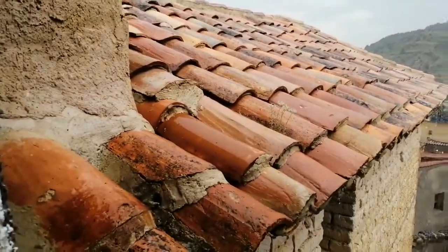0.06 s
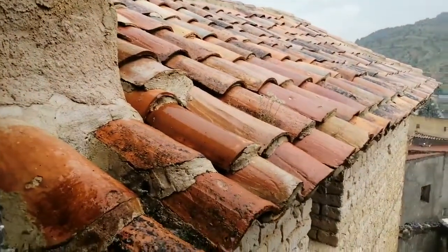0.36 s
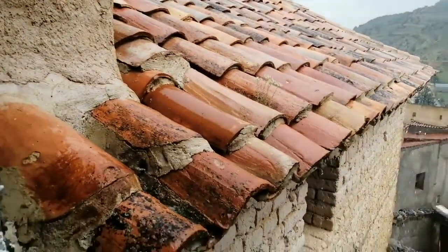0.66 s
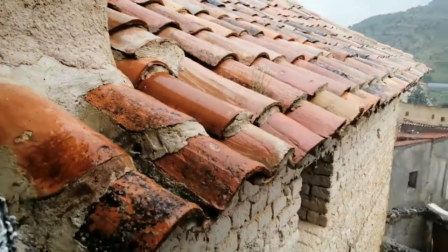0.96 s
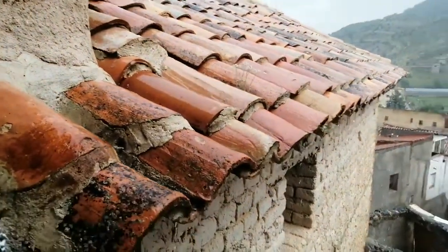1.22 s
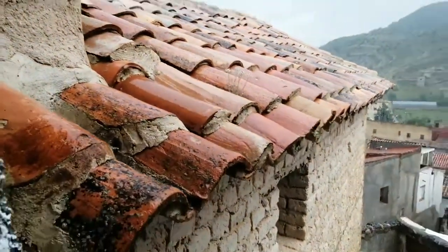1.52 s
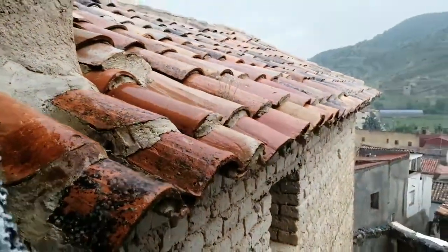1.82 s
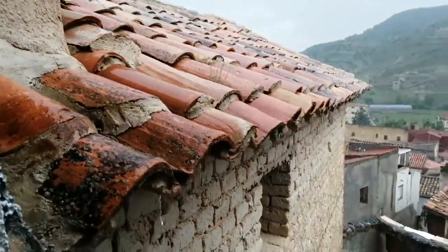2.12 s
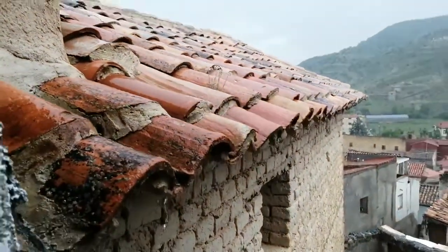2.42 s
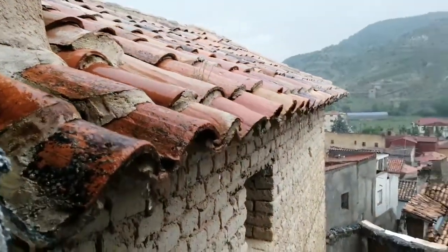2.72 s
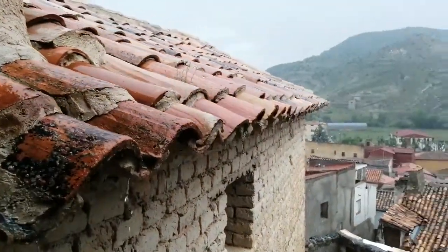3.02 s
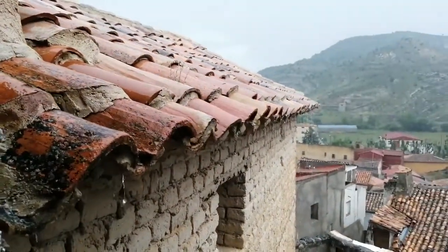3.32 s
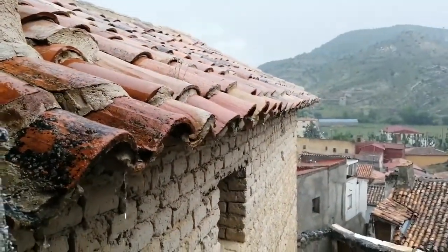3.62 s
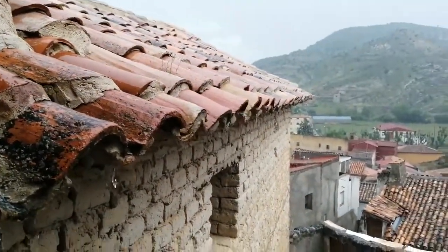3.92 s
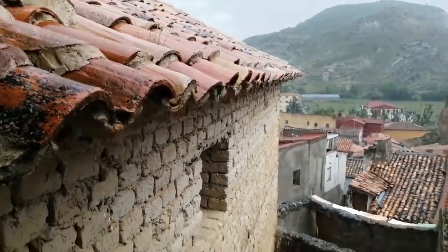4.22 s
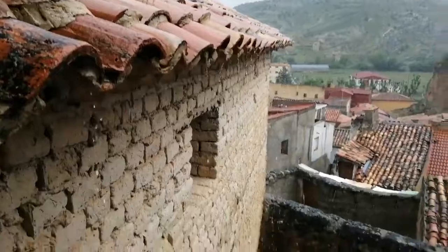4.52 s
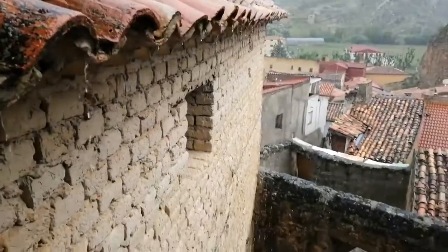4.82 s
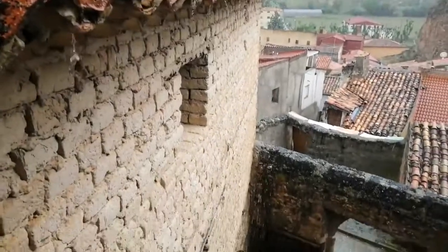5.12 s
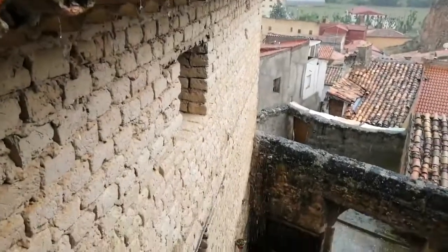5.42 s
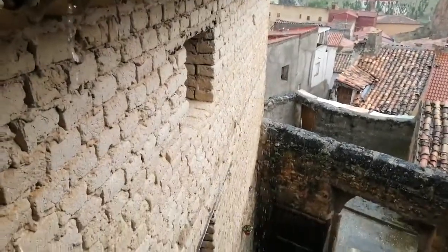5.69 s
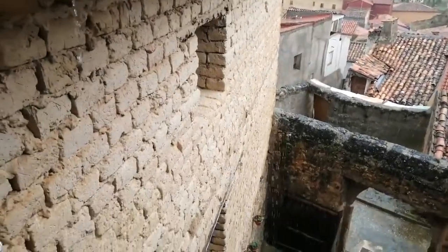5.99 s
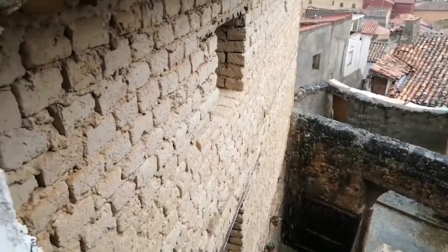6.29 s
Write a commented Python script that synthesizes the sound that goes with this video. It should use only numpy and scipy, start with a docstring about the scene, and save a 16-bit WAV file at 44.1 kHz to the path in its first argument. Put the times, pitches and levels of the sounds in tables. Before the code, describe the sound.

Steady rain patters and hisses on a clay tile roof, heard in stereo from close by the eaves. Single near drops tick and splash at uneven intervals, some with a faint hollow ring. Wind buffets the left side of the microphone at the start with a few low thumps, then comes and goes as a soft rumble. About halfway through, a stronger gust rushes past and fades while the rain carries on.

```python
"""Rain on a clay tile roof

Steady rain, heard from just under the eaves. Near drops tick on the wet tiles, make them ring
and burst into spray, over the patter and hiss of the whole roof. Gusts of wind rumble, rush and
briefly moan, and their eddies (small swirls of air) buffet the left and right microphones."""
import sys
import numpy as np
from scipy import signal
from scipy.fft import rfft, irfft, next_fast_len
from scipy.io import wavfile

SR = 44100
rng = np.random.default_rng(int(sys.argv[2]) if len(sys.argv) > 2 else 0)


def to_wav(sig):
    """Store sig (one row per channel, or 1-D mono) as 16-bit WAV at the path in sys.argv[1].

    Samples outside -1..1 are clipped; the rate is SR.
    """
    pcm = np.clip(np.atleast_2d(sig), -1, 1) * 32767
    pcm = np.round(pcm).astype(np.int16)
    wavfile.write(sys.argv[1], SR, pcm.T)  # frames by channels


N = 280035
TIME = np.arange(N) / SR
FFT_SIZE = next_fast_len(N + N % 2, True)

# Near drops. Each row: start in seconds, tick in dB, splash in dB, size from 0 (fine) to 1 (fat),
# tile ring in dB, ring pitch in Hz. Each level compares a drop with the other drops.
NEAR_DROPS = [(0.119, -16, -48, .5, -48.5, 2560), (0.137, -33, -46.5, 0.79, -64, 2500),
              (0.262, -26.5, -47.5, .4, -74, 2100), (0.315, -23, -49, 0.48, -70, 2700),
              (0.519, -31, -44.5, 0.84, -53, 2700), (0.54, -28, -60, 0.27, -46, 2500),
              (0.677, -14, -48, 0.5, -53, 2700), (0.738, -31, -47, 0.69, -60, 2350),
              (0.958, -24, -48.5, 0.35, -46, 2200), (1.004, -31, -45.5, .5, -60, 2690),
              (1.133, -21, -53, .4, -46.5, 2800), (1.205, -32, -47, .4, -47.5, 2400),
              (1.265, -24, -44.5, 0.31, -81, 2300), (1.335, -41, -56, 0, -73, 1600),
              (1.4, -22, -42.5, 0.19, -73, 2700), (1.445, -25, -49.5, 0.63, -60, 2600),
              (1.6, -34, -48.5, 0, -70, 2600), (1.828, -21, -45.5, 0.88, -46.5, 2610),
              (1.958, -21, -47, 0.37, -42, 2680), (1.99, -28, -46, 0.92, -60, 2900),
              (2.091, -36, -46.5, 0.29, -51.5, 2650), (2.32, -29, -48, 0.094, -52, 2600),
              (2.414, -37, -49, 0.33, -45.5, 2280), (2.481, -38, -64, 0.28, -47, 1970),
              (2.538, -32, -46.5, 0.46, -56, 2100), (2.908, -35, -51, 0, -73, 2200),
              (2.982, -27, -46, 0.22, -53, 2880), (3.057, -25, -47, .2, -56, 2500),
              (3.321, -18, -45.5, 0.18, -69, 3000), (3.499, -22, -46, 0.11, -72, 3100),
              (3.548, -38, -57, 0, -70, 2600), (3.844, -20.5, -46.5, .9, -52, 3000),
              (4.012, -33, -49, .2, -72, 1900), (4.081, -23, -48.5, 0, -74, 2150),
              (4.236, -31, -49, 0.037, -53, 3000), (4.308, -27, -46.5, 0.41, -46.5, 2470),
              (4.48, -29, -54, .3, -48, 2520), (4.646, -24, -51, 0, -55, 3050),
              (4.863, -29, -50.5, 0.45, -62, 2600), (5.172, -37, -55, 0, -51.5, 2750),
              (5.359, -23, -48, 0.16, -59, 3350), (5.481, -22, -44.5, 1, -42, 2700),
              (5.536, -31, -48.5, 0.65, -55, 2750), (5.699, -31, -47, 0.16, -49, 2800),
              (5.909, -33, -52, 0, -54, 3250)]
# How hard it rains. Each row: time in seconds, high patter and low body of the tiles in relative dB.
RAIN_LEVELS = [(0.0, -46.5, -58), (1.15, -46.5, -58), (1.48, -45, -59.5), (2.35, -46, -56),
               (2.71, -46, -59.5), (3.38, -47.5, -60), (4.54, -47.5, -58.5), (4.99, -49, -59),
               (5.61, -47, -57), (5.89, -47, -59), (6.35, -46, -59.5)]
# The tone of the rain. Each row: frequency in Hz, left gain in dB, right gain in dB.
RAIN_TONE = [(100, -6, -12.5), (524, -13, -17), (1000, -8.5, -17), (1410, -10.5, -16.5), (1810, -9, -17),
             (2140, -13.5, -16.5), (2410, -13, -18), (3470, -15, -14.5), (3840, -16.5, -18),
             (5350, -9, -9.5), (5960, -7, -12), (6875, -2.5, -14.5), (7800, -15, -21.5),
             (11500, -18.5, -22), (14100, -18, -17.5), (15000, -15.5, -21)]
# How alike the rain is at two microphones a hand apart.
# Each row: frequency in Hz, likeness from -1 (opposite) to 1 (the same).
RAIN_LIKENESS = [(100, 0.8), (800, 0.29), (1150, -0.35), (1750, -0.47), (2250, 0.59), (3000, -0.13),
                 (3700, -0.11), (6000, -0.036)]
# How hard the wind blows. Each row: time in seconds, level of its rush in relative dB.
WIND_LEVELS = [(0, -57.5), (0.5, -67), (0.72, -56.5), (1.02, -63), (1.38, -61.5), (1.98, -67), (2.55, -64),
               (2.86, -47), (3.08, -43), (3.21, -43), (3.28, -38), (3.37, -50.5), (3.72, -49.5),
               (4.17, -60.5), (4.52, -56), (5.69, -64.5), (5.82, -53.5), (5.98, -63.5), (6.35, -62)]
# Puffs that swell the rumble. Each row: middle in seconds, peak in relative dB, half length in seconds.
WIND_PUFFS = [(0.536, -36, 0.29), (0.793, -44.5, 0.22), (1.216, -42.5, 0.032), (1.405, -43, 0.17),
              (1.758, -46, 0.079), (2.3, -51, .05), (2.754, -36, 0.15), (2.893, -33.5, 0.049),
              (3.118, -31.5, 0.074), (3.353, -36.5, .06), (3.695, -38, 0.071), (3.966, -47, 0.099),
              (4.51, -44.5, 0.093), (5.83, -44.5, 0.064)]
# The tone of the wind's deep rumble. Each row: frequency in Hz, gain in dB.
RUMBLE_TONE = [(20, -43), (50, -4), (80, -3), (130, 1.5), (200, 0), (250, -9), (310, -13), (450, -19),
               (700, -30.5), (1500, -66.5)]
# The tone of the wind's higher rush. Each row: frequency in Hz, gain in dB.
RUSH_TONE = [(150, -24), (320, -8.5), (420, -0.5), (520, -2), (620, -4.5), (740, -7), (1080, -10),
             (1280, -21.5), (1700, -27.5), (3000, -57.5)]
# How hard eddies hit the microphones. Each row: time in seconds, left and right level in relative dB.
EDDY_LEVELS = [(0, -25, -43), (0.15, -22, -49), (0.38, -24, -56), (0.58, -40, -45), (0.78, -51, -55),
               (1.28, -42, -38), (1.72, -58, -41.5), (1.88, -49, -51.5), (2.25, -42, -48.5),
               (2.42, -48.5, -71), (2.87, -51, -38.5), (3.25, -37.5, -52), (3.6, -53, -64),
               (4.55, -53.5, -73), (6.35, -51.5, -67)]
# The tone of a soft eddy. Each row: frequency in Hz, gain in dB.
SOFT_EDDY_TONE = [(10, -6.5), (25, -1), (42, -6), (70, -1.5), (120, -4), (200, -7.5), (350, -24),
                  (600, -34), (1200, -90)]
# The tone of a hard eddy. Each row: frequency in Hz, gain in dB.
HARD_EDDY_TONE = [(10, -10), (25, -11), (42, -6), (70, 1), (130, -1), (210, -5), (330, -20), (520, -29),
                  (700, -47), (1400, -66)]
# The hardest eddies, all on the left microphone. Each row: time in seconds, peak in dB.
EDDY_THUMPS = [(0.119, -18), (0.266, -18), (0.294, -13), (0.321, -15.5), (0.387, -13.5), (0.398, -14.5)]
# The wind moans as it speeds up. Each row: middle in seconds, peak in relative dB,
# half length in seconds, pitch at the middle in Hz.
WIND_MOANS = [(0.665, -55, 0.12, 626), (3.1, -58, .16, 987), (3.279, -49, 0.021, 1120)]


def roof():
    """Far drops merge into hiss; nearer ones each make a tick or a short burst of droplets."""
    patter_db, body_db = in_time(RAIN_LEVELS)
    hiss = from_db(-2) * rng.standard_normal((2, N))
    splashes = (from_db(-12) * far_splashes(per_s=70, spread_db=3.8, low_hz=1250, high_hz=4020)
                + from_db(-8) * far_splashes(per_s=90, spread_db=0.47, low_hz=4860, high_hz=7900)
                + from_db(-8.5) * far_splashes(per_s=46, spread_db=4.3, low_hz=7550, high_hz=18000))
    ticks = from_db(-12) * clicks(per_s=450, spread_db=2.2)
    fine_ticks = from_db(-12) * rms_one(band(clicks(per_s=80, spread_db=3.5), 11000, 17000))
    rain = colour(all_around(hiss + splashes + ticks + fine_ticks), RAIN_TONE)
    split_hz = 3900
    low = signal.sosfilt(signal.butter(2, split_hz, fs=SR, output="sos"), rain)
    high = signal.sosfilt(signal.butter(2, split_hz, "high", fs=SR, output="sos"), rain)
    patter = from_db(patter_db + 0.5) * high / band(high, split_hz, 10600).std()
    body = from_db(body_db - 0.48) * low / band(low, 1570, 3700).std()
    return patter - body  # the halves swing opposite ways where they meet, so one is flipped


def far_splashes(per_s, spread_db, low_hz, high_hz):
    """Drops hit at random moments, each throwing up a cloud of droplets that soon land again."""
    t = TIME[:SR // 2]
    rise_s, fall_s = 0.0034, 0.011
    one_cloud = (1 - np.exp(-t / rise_s)) ** 2 * np.exp(-t / fall_s)
    power = signal.fftconvolve(impacts(per_s, spread_db) ** 2, one_cloud / one_cloud.max())[:N]
    droplets = band(clicks(per_s=5000, spread_db=2), low_hz, high_hz)
    return rms_one(np.sqrt(np.maximum(power, 0)) * droplets)


def near_drops():
    """Each drop ticks on a tile, splashes, makes the tile ring hollowly and throws fine spray."""
    length = SR // 6
    droplets = colour(clicks(per_s=6000, spread_db=3), RAIN_TONE)
    splash_noise, ring_noise = band(droplets, 3100, 7850), band(droplets, 1380, 5000)
    # fine droplets are few enough to tick one by one
    spray_noise = band(colour(clicks(per_s=2800, spread_db=4.5), RAIN_TONE), 6650, 16000)
    tick_noise = band(colour(rng.standard_normal(N), RAIN_TONE), 5200, 8200)
    out = np.zeros((2, N + length))
    for start_s, tick_db, splash_db, size, ring_db, ring_hz in NEAR_DROPS:
        now = slice(int(start_s * SR), int(start_s * SR) + length)
        # the fatter the drop, the lower and longer its splash and the less spray it throws
        splash_hz = np.interp(size, [0, 1], [7120, 4780])
        splash_s = np.interp(size, [0, 1], [0.017, 0.049])
        spray_db = splash_db + np.interp(size, [0, 1], [4, -23.5])
        splash = resonance(splash_noise[:, now], splash_hz, width_hz=1500)
        ring = resonance(ring_noise[:, now], ring_hz, width_hz=480)
        out[:, now] += from_db(splash_db + 7) * burst(splash, rise_s=0.0044, fall_s=splash_s)
        out[:, now] += from_db(ring_db) * burst(ring, rise_s=0.00067, fall_s=0.044)
        out[:, now] += from_db(spray_db) * burst(spray_noise[:, now], rise_s=0.0023, fall_s=0.035)
        # the drop itself flattens in about a millisecond
        tick = burst(tick_noise[:, now], rise_s=0.0003, fall_s=0.001)
        tick[0] = np.roll(tick[0], rng.integers(0, SR // 2500))  # up to 0.4 ms later on the left
        out[:, now] += from_db(tick_db - 3.5) * tick / np.abs(tick).max()
    return out[:, :N]


def gusts():
    """Wind rumbles on both microphones and swells in puffs, with a higher rush when it is strong."""
    wind_db, = in_time(WIND_LEVELS)
    usual_wind_db, share_of_swing = -60, 0.75
    steady = from_db(-51.5 + share_of_swing * (wind_db - usual_wind_db))
    puffs = [swell(*puff) for puff in WIND_PUFFS]
    rumble_gain = np.linalg.norm([steady, *puffs], axis=0)  # their powers add up
    rumble = rms_one(colour(rng.standard_normal(N) * from_db(2.1 * drift(per_s=12)), RUMBLE_TONE))
    rough_air = rng.standard_normal(N) + 0.96 * rng.standard_normal((2, N))  # shared + each side's own
    rush = rms_one(colour(rough_air * from_db(1.76 * drift(per_s=36)), RUSH_TONE))
    return (rumble_gain * rumble + from_db(wind_db) * rush) * from_db([[1.7], [-1.7]])  # louder left


def buffets():
    """Eddies push unevenly on each microphone; the harder they hit, the higher they sound."""
    level_db = in_time(EDDY_LEVELS)
    lumps = clicks(per_s=1200, spread_db=1.5)
    soft = rms_one(colour(lumps, SOFT_EDDY_TONE))
    hard = from_db(-1) * rms_one(colour(lumps, HARD_EDDY_TONE))
    hardness = np.clip((level_db + 42.5) / 14, 0, 1)
    return from_db(level_db) * ((1 - hardness) * soft + hardness * hard)


def thumps():
    """A passing eddy is one swing of pressure with a dip on either side."""
    width_s, right_db = 0.00069, -34
    left = np.zeros(N)
    for middle_s, peak_db in EDDY_THUMPS:
        offset = np.clip((TIME - middle_s) / width_s, -10, 10)
        swing = 2 * np.exp(-offset ** 2 / 2) - np.exp(-offset ** 2 / 8)
        left += from_db(peak_db) * swing * rng.choice([-1, 1])
    return np.array([left, from_db(right_db) * left])


def moan():
    """Eddies peel off an edge and make a wavering note that glides upward."""
    rise_hz_per_s = 520
    notes = 0
    for middle_s, peak_db, half_s, hz in WIND_MOANS:
        phase = 2 * np.pi * np.cumsum(hz + rise_hz_per_s * (TIME - middle_s)) / SR
        notes = notes + swell(middle_s, peak_db, half_s) * np.exp(1j * phase)
    waver = drift(per_s=58) + 1j * drift(per_s=33)  # blurs each note into a narrow band of noise
    return np.real(notes * waver) * from_db([[1.5], [-1.5]])  # louder left


def impacts(per_s, spread_db):
    """Random hits: many small ones and a few large ones."""
    sizes = from_db(spread_db * np.minimum(rng.exponential(1, N), 4))
    return sizes * (rng.random(N) < per_s / SR)


def clicks(per_s, spread_db):
    """Random clicks that push or pull, separate on the left and right."""
    hits = np.array([impacts(per_s, spread_db) for side in "LR"])
    return rms_one(hits * rng.choice([-1, 1], (2, N)))


def burst(sound, rise_s, fall_s):
    """Makes a sound start quickly and die away."""
    t = TIME[:sound.shape[-1]]
    shape = (1 - np.exp(-t / rise_s)) * np.exp(-(t / fall_s) ** 1.5)
    return rms_one(sound) * shape / shape.max()


def swell(middle_s, peak_db, half_s):
    """A bell-shaped rise and fall."""
    return from_db(peak_db) * np.exp(-np.minimum(np.abs(TIME - middle_s) / half_s, 10) ** 2)


def drift(per_s):
    """A smooth random curve that changes about `per_s` times a second."""
    points, step = 2 ** 15, 16
    hz = np.fft.rfftfreq(points, step / SR)
    slow = irfft(rfft(rng.standard_normal(points)) / (1 + (hz / per_s) ** 2))
    return rms_one(np.interp(np.arange(N) / step, np.arange(points), slow))


def all_around(pair):
    """Mixes two unrelated signals into sound that reaches the microphones from all sides."""
    angle = np.arcsin(np.clip(over_hz(RAIN_LIKENESS), -1, 1)) / 2
    spectra = rfft(pair, FFT_SIZE)
    return irfft(np.cos(angle) * spectra + np.sin(angle) * spectra[::-1], FFT_SIZE)[:, :N]


def colour(x, tone):
    """Gives a sound the tone set out in a table."""
    cepstrum = irfft(np.log(from_db(over_hz(tone))), FFT_SIZE)
    # folding it in half makes the filter ring only after a click, never before (minimum phase)
    cepstrum[:, 1:FFT_SIZE // 2] *= 2
    cepstrum[:, FFT_SIZE // 2 + 1:] = 0
    return irfft(rfft(x, FFT_SIZE) * np.exp(rfft(cepstrum)), FFT_SIZE)[:, :N]


def resonance(x, hz, width_hz):
    """Lets one pitch ring through and weakens the rest."""
    decay = np.exp(-np.pi * width_hz / SR)
    feedback = [1, -2 * decay * np.cos(2 * np.pi * hz / SR), decay ** 2]
    return signal.lfilter(np.array([1, 0, -1]) * (1 - decay ** 2) / 2, feedback, x)


def band(x, low_hz, high_hz):
    """Keeps the sound between two frequencies."""
    return signal.sosfilt(signal.butter(3, [low_hz, high_hz], "band", fs=SR, output="sos"), x)


def in_time(rows):
    """Joins a table's rows with lines, giving values for every sample."""
    seconds, *columns = np.transpose(rows)
    return np.array([np.interp(TIME, seconds, column) for column in columns])


def over_hz(rows):
    """Joins a table's rows with lines, giving values for every frequency."""
    hz, *columns = np.transpose(rows)
    bins = np.maximum(np.fft.rfftfreq(FFT_SIZE, 1 / SR), 1)
    return np.array([np.interp(np.log(bins), np.log(hz), column) for column in columns])


def from_db(db):
    """Turns decibels into a number to multiply by."""
    return 10 ** (np.asarray(db) / 20)


def rms_one(x):
    """Scales a signal to an average power of 1."""
    return x / np.sqrt(np.mean(x ** 2) + 1e-20)


def scene():
    """Rain and wind together, in stereo."""
    return roof() + near_drops() + gusts() + moan() + buffets() + thumps()


def record(dry):
    """Cuts off the highest treble steeply."""
    cutoff_hz = 15800
    return signal.sosfilt(signal.ellip(12, 0.1, 80, cutoff_hz, fs=SR, output="sos"), dry)


dry = scene()
out = record(dry)
to_wav(out)
```